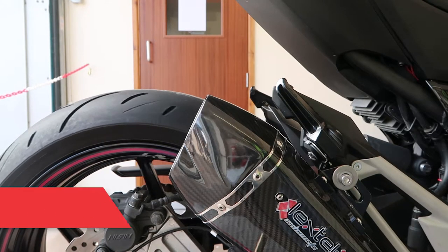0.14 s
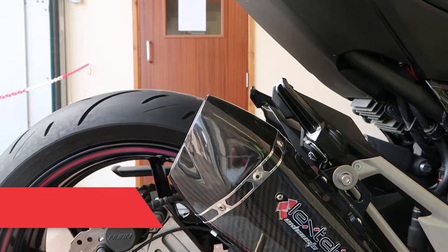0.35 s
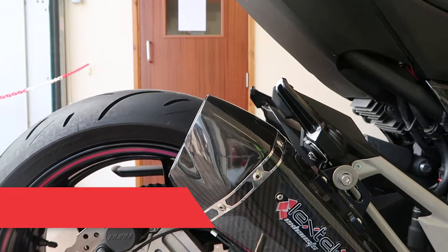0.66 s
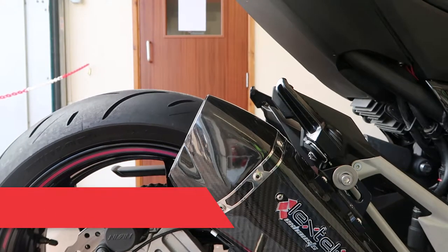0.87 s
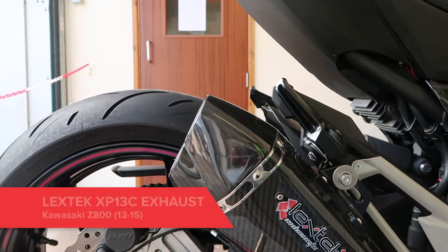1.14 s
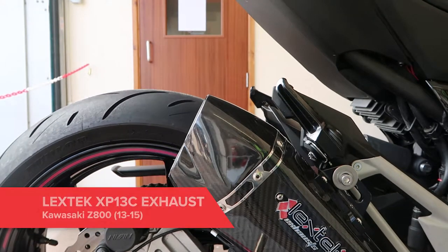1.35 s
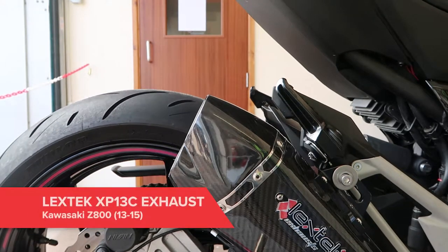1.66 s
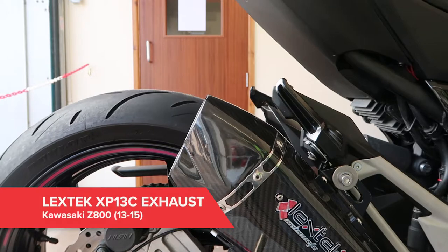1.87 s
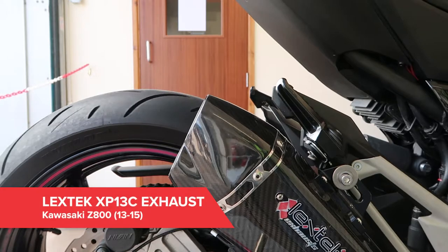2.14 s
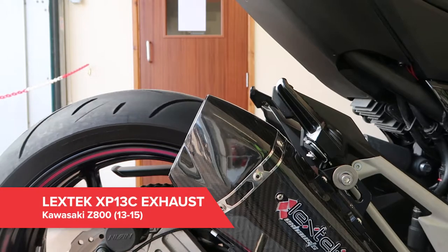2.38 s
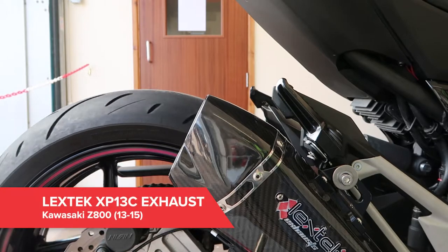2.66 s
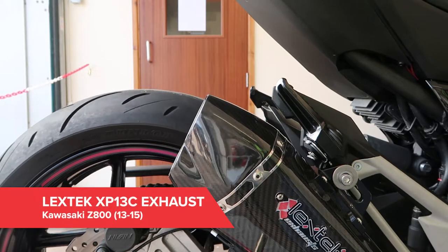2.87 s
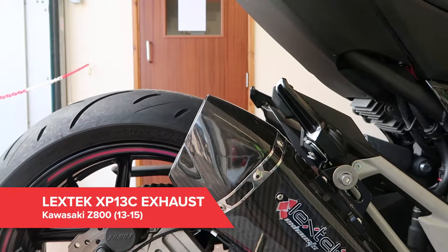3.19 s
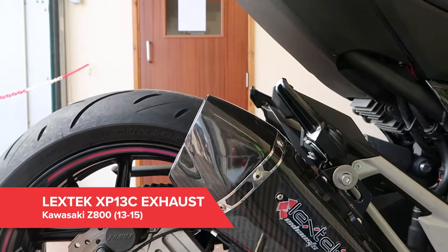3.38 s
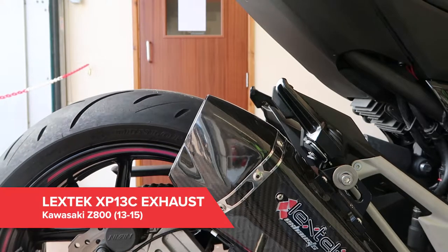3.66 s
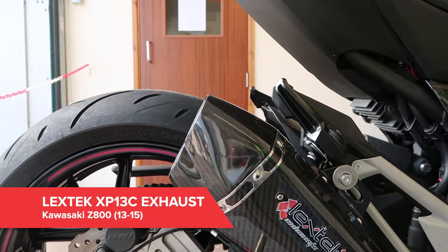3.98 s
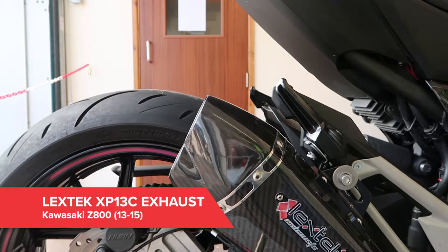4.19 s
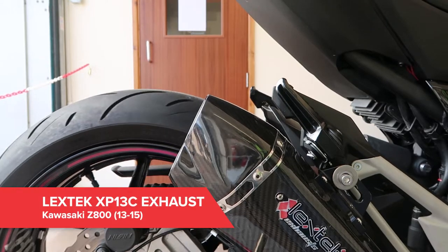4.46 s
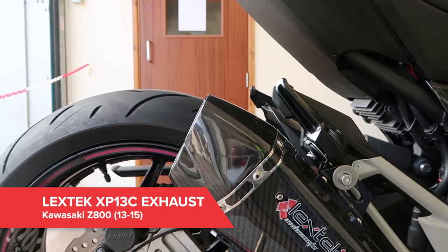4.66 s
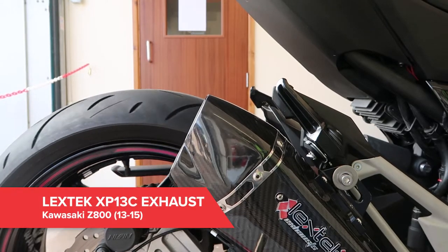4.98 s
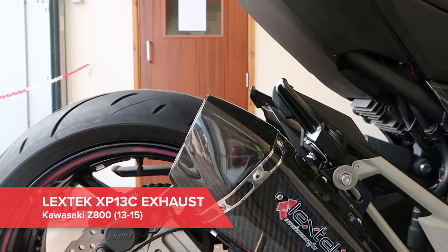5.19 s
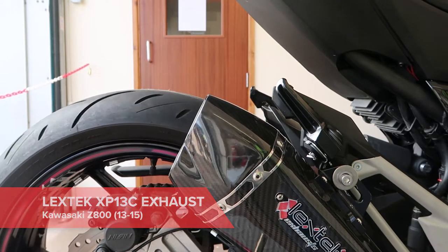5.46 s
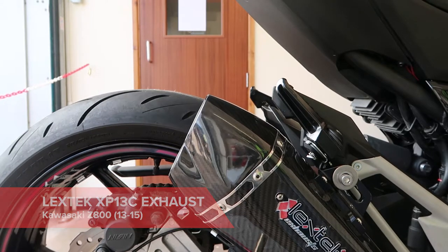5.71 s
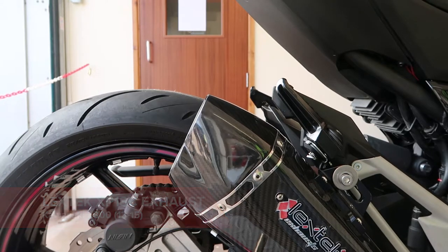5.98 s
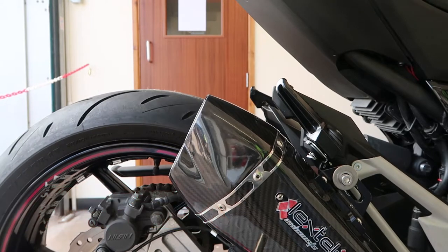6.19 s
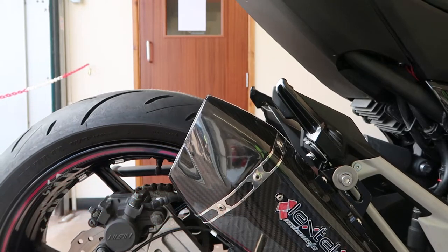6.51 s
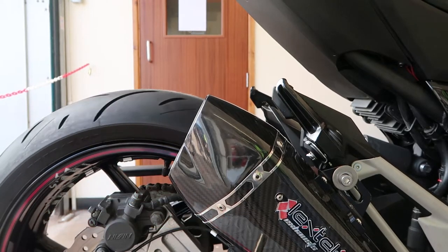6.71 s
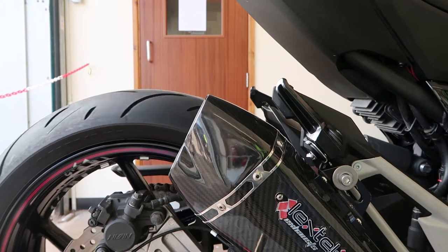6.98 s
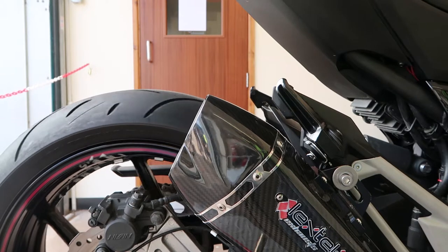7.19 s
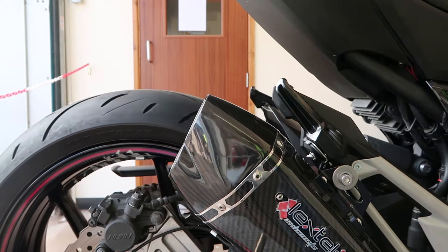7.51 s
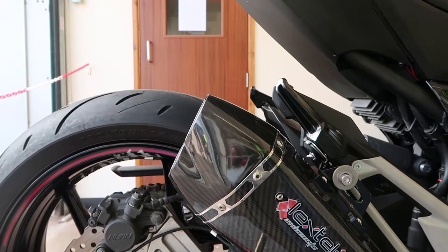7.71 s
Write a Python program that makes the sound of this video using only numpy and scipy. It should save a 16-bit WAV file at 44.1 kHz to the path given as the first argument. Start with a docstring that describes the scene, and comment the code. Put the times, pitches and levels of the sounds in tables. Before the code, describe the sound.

A motorcycle engine idles unevenly indoors and is revved three times, each sharp, loud blip winding back down toward idle.

```python
"""Motorcycle in a workshop

A four-cylinder engine idles between hard walls and its throttle is blipped three times. At idle and
under load, burnt gas leaves in uneven pulses; on the overrun the cylinders pump air and sing clean
harmonics. Silencer and room resonate, gas hisses at the outlet, and a mid-side microphone is close by."""
import sys
import numpy as np
from scipy import signal
from scipy.fft import rfft, irfft, next_fast_len
from scipy.io import wavfile
from scipy.ndimage import uniform_filter1d

SR = 44100
rng = np.random.default_rng(int(sys.argv[2]) if len(sys.argv) > 2 else 0)


def digitize_waveform(pressure):
    """Quantize a signal to 16-bit integers and store it at the path in sys.argv[1].

    Rows of a 2-D input are taken as channels; values are limited to [-1, 1].
    """
    field = np.atleast_2d(pressure).T
    bounded = np.clip(field, -1, 1)
    quanta = np.round(bounded * 32767).astype(np.int16)
    wavfile.write(sys.argv[1], SR, quanta)


N = 346185

# firings that stand out from their neighbours: (time [s], relative level [dB])
STRONG_FIRINGS = [(0.709, -11.5), (0.83, -11.5), (0.86, -13.0), (0.943, -11.5), (1.102, -13.5),
                  (1.346, -12.0), (1.368, -11.5), (1.389, -11.5), (1.507, -12.5), (1.529, -12.0),
                  (1.551, -10.0), (1.574, -10.0), (1.646, -14.5), (1.693, -14.5), (1.713, -11.5),
                  (1.729, -6.0), (1.776, -0.5), (1.795, 0.0), (3.038, -13.5), (3.052, -13.5),
                  (3.072, -13.5), (3.095, -12.0), (3.111, -15.0), (3.198, -14.5), (3.388, -11.5),
                  (3.407, -14.0), (3.426, -13.0), (3.531, -15.0), (3.552, -15.0), (3.576, -14.5),
                  (3.612, -15.0), (3.632, -14.5), (3.72, -14.5), (3.742, -14.5), (3.764, -10.5),
                  (3.804, -11.5), (3.892, -10.5), (3.914, -10.5), (3.935, -9.5), (3.954, -3.5), (3.97, 2.0),
                  (3.985, 5.5), (4.009, 6.0), (4.049, 3.5), (5.478, -13.0), (5.495, -11.0), (5.543, -13.0),
                  (5.579, -7.0), (5.614, -11.5), (5.694, -14.5), (5.769, -13.5), (5.872, -14.5),
                  (5.89, -14.0), (5.909, -10.5), (6.031, -13.5), (6.072, -13.5), (6.112, -15.0),
                  (6.133, -15.0), (6.225, -14.5), (6.249, -12.0), (6.271, -10.0), (6.293, -11.0),
                  (6.313, -7.5), (6.33, 1.0), (6.345, 5.5), (6.37, 6.0), (6.4, 6.0), (7.727, -14.5),
                  (7.775, -15.0)]
# resonances of silencer and room: (frequency [Hz], width [Hz], gain [dB])
SILENCER_AND_ROOM = [(117, 62, 11), (156, 5, -6.5), (164.4, 45, 4.5), (214, 43.5, 12.5), (242, 15, -4),
                     (267.7, 19, 10), (316.3, 38.4, 12), (356, 8.1, -6), (374.6, 14, 9.5),
                     (388.3, 8.6, -12), (424.6, 67, 11.5), (484, 18.3, 7.5), (554, 4.8, -8), (546, 23, 10),
                     (586.5, 50.5, 7.5), (614.4, 11, -3.5), (628, 26, 7.5), (659.6, 14, -20.5),
                     (687.7, 35, 6.5), (747.7, 105, 10.5), (796, 4.1, -11), (836, 90, 6), (863, 30, -17.5),
                     (1042, 89, 12), (1196, 112, -12.5), (1328, 53, 10.5), (1603, 37, 5)]


def from_db(db):
    return 10 ** (np.asarray(db) / 20)


def unit_rms(x):
    return x / np.sqrt(np.mean(x ** 2) + 1e-20)


def curves(rows, start_s=0):
    """Linear interpolation of each column against time, counted from start_s."""
    times, *columns = np.transpose(rows)
    return np.array([np.interp(np.arange(N) / SR, times + start_s, column) for column in columns])


def ramp(start_s, length_s):
    return np.clip((np.arange(N) / SR - start_s) / length_s, 0, 1)


def butter(x, hz, kind, order):
    return signal.sosfilt(signal.butter(order, hz, kind, fs=SR, output="sos"), x)


def coloured(x, points):
    """Spectral shaping by (frequency [Hz], gain [dB]) points on a logarithmic frequency axis."""
    size = next_fast_len(N + 4096)
    hz = np.maximum(np.arange(size // 2 + 1) * SR / size, 1)
    point_hz, point_db = np.transpose(points)
    gain = from_db(np.interp(np.log(hz), np.log(point_hz), point_db))
    return irfft(rfft(x, size) * gain, size)[..., :N]


def resonant(x, resonances):
    """Resonances and antiresonances as a cascade of second-order filters."""
    sections = []
    for hz, width_hz, db in resonances:
        a, cos, q = from_db(db / 2), np.cos(2 * np.pi * hz / SR), np.pi * width_hz / SR
        section = np.array([1 + q * a, -2 * cos, 1 - q * a, 1 + q / a, -2 * cos, 1 - q / a])
        sections.append(section / section[3])
    return signal.sosfilt(sections, x)


def train(at, size):
    """Impulses at fractional sample positions, each shared by two samples."""
    out = np.full(N + 2, 1e-18)
    at = np.clip(at, 0, N)
    np.add.at(out, at.astype(int), size * (1 - at % 1))
    np.add.at(out, at.astype(int) + 1, size * (at % 1))
    return out[:N]


def throttle():
    """Fuel supply governs the source: firing rate, burning share, and pulse, hiss and buzz levels."""
    # the first blip shuts before the start: (opens [s], rate factor [1], shuts [s], fuel returns [s])
    blips = [(-.75, 1, -.45, .524), (1.7, 1, 1.98, 2.936), (3.948, 1.04, 4.275, 5.405),
             (6.308, 1.02, 6.62, 7.712)]
    # run-up: (time after opening [s], firing rate [Hz])
    climb = [(-.05, 58), (0, 46), (.04, 75), (.1, 116), (.16, 181), (.28, 300), (.6, 630)]
    # run-down to idle: (time after fuel returns [s], firing rate [Hz])
    coast = [(-1.3, 417), (-.975, 330), (-.525, 210), (-.375, 174), (-.225, 141), (-.075, 113), (.12, 87),
             (.3, 67), (.45, 55), (.68, 47), (1, 43)]
    # open throttle: (time after opening [s], pulse level [dB], hiss level [dB])
    open_levels = [(-.04, -30, -58), (0, -23.5, -52.5), (.03, -12, -44), (.07, -8.5, -46),
                   (.13, -10, -38.5), (.165, -9.5, -33), (.21, -7.5, -28), (.245, -9, -27), (.31, -9, -25)]
    # shut throttle: (time after fuel returns [s], pulse level [dB], hiss level [dB])
    shut_levels = [(-1.05, -16, -45), (-.95, -15.5, -47), (-.88, -14, -42), (-.79, -14, -36),
                   (-.66, -14.5, -42), (-.48, -15.5, -41), (-.4, -17.5, -44), (-.24, -22, -51),
                   (-.17, -21, -49), (-.03, -25, -55.5), (.53, -31, -60.5)]
    # the outlet tube buzzes once on each overrun: (time after fuel returns [s], gain [dB])
    buzz = [(-1, -8), (-.92, -1), (-.8, 7), (-.72, 2), (-.64, 1), (-.5, -6), (-.25, -15), (-.17, -9),
            (-.05, -16)]
    rounding_hz, dribble = 20.5, .06
    state = 0
    for opens, pull, shuts, refuels in blips:
        rising, falling = pull * curves(climb, opens)[0], curves(coast, refuels)[0]
        rate_hz = -rounding_hz * np.logaddexp(-rising / rounding_hz, -falling / rounding_hz)  # soft min
        fuel_cut = ramp(shuts + .062, .012)
        burn = 1 - (1 - dribble) * (fuel_cut - ramp(refuels - .02, .12))
        fired_db = curves(open_levels, opens) + ramp(shuts, .03) * np.array([[-4.5], [-7]])
        coasting = np.array([fuel_cut, ramp(shuts + .03, .08)])  # gas flow dies more slowly than firing
        levels_db = (1 - coasting) * fired_db + coasting * curves(shut_levels, refuels)
        blip = np.vstack([rate_hz, burn, levels_db, curves(buzz, refuels)])
        state = state + ramp(opens - .07, .03) * (blip - state)  # each blip takes over from the last
    return state


def surges(pulse_db):
    """Hunting: the level swells towards each strong firing and sags after it; returns the added dB."""
    t = np.arange(N) / SR
    slope_db_per_s = 183.5
    swells_db = [min(db - 13, -21.5) - slope_db_per_s * abs(t - s) for s, db in STRONG_FIRINGS]
    return np.maximum(np.max(swells_db, axis=0) - pulse_db, 0)


def crank(rate_hz):
    """Phase is the integral of rate: a firing count, eased to put strong firings on whole numbers."""
    firings = np.cumsum(rate_hz) / SR
    at = np.array(STRONG_FIRINGS)[:, 0] * SR
    counts = np.interp(at, np.arange(N), firings)
    whole = np.cumsum(np.maximum(np.round(np.diff(counts, prepend=0)), 1))
    return firings + np.interp(np.arange(N), at, whole - counts), whole.astype(int)


def exhaust(firings, strong, rate_hz, pulse_db, burn, buzz_db):
    """Source and filter: one gas pulse per firing excites the resonances of silencer and room."""
    # the four cylinders in firing order: (relative level [dB])
    cylinders = [0, -.5, .3, -.3]
    count = np.arange(1, int(firings[-1]))
    at = np.interp(count, firings, np.arange(N))
    i = np.minimum(at.astype(int), N - 1)
    rate_hz, pulse_db, burn = rate_hz[i], pulse_db[i], burn[i]
    size = from_db(pulse_db + np.array(cylinders)[count % 4]) / np.sqrt(rate_hz)  # pulses share power
    time_draw, level_draw, puff_time_draw, puff_size_draw = rng.standard_normal((len(count), 4)).T
    lope_db = 3 * unit_rms(butter(rng.standard_normal(N), 7, "low", order=2))  # idle fires in clumps
    load = np.clip((pulse_db + 22) / 9, 0, 1)
    steep = load * np.clip((rate_hz - 60) / 110, 0, 1)  # the wave front steepens with load and speed

    # combustion is most irregular at low speed and light load
    slowness = np.clip(50 / rate_hz, .12, 1)
    uneven_db = .6 + 2.5 * (1 - load) * slowness
    jitter_ms = slowness * (1 - .8 * load)
    burnt = size * burn * from_db(uneven_db * level_draw + (lope_db[i] - 5.5) * (1 - load))
    burnt[strong - 1] = from_db(np.array(STRONG_FIRINGS)[:, 1] - 32)
    time_draw[strong - 1] = 0
    burnt_at = at + (jitter_ms * time_draw - 1.5 - .94 * (1 - load)) * SR / 1000

    # off load, weaker puffs of either sign fill the gaps with a burble
    puff_at = burnt_at + (.524 + .33 * puff_time_draw) * SR / rate_hz
    puffs = .7 * size * burn * (1 - load) * np.tanh(puff_size_draw)
    dull = train(burnt_at, burnt * (1 - load)) + train(puff_at, puffs)
    dull = butter(butter(dull, 188, "high", order=2), 410, "low", order=5)
    punch = train(burnt_at, burnt * (load - steep))  # full load at low speed: tight thuds
    punch = butter(butter(punch, 270, "high", order=2), 472, "low", order=4)
    sharp = train(burnt_at, burnt * steep)
    sharp = butter(butter(sharp, 290, "high", order=2), 716, "low", order=4)
    combustion = from_db(6) * dull + from_db(4.5) * punch + from_db(-3) * sharp

    # pumped air pulses steadily; two header pairs of unequal length add the crank's odd orders
    air = size * np.sqrt(1 - burn ** 2) * from_db(.55 * level_draw)
    even = train(at, air)
    odd = butter(train(at, (air + .12 * burnt * steep) * (-1) ** count), 235, "high", order=3)
    pumping = butter(butter(even, 72, "high", order=3), 447, "low", order=3)
    pumping += from_db(-8.5) * butter(odd, 509, "low", order=2)

    # steep fronts and the buzzing outlet tube supply the treble
    fronts = train(burnt_at, burnt * steep ** 2)
    buzz = from_db(buzz_db) * (odd + from_db(-6) * even)
    rasp = butter(from_db(-12) * fronts + from_db(-28) * buzz, [980, 1720], "band", order=4)
    ring = butter(from_db(-22) * fronts + from_db(-27) * buzz, [2810, 2980], "band", order=2)
    return resonant(-from_db(56) * (combustion + pumping + rasp + ring), SILENCER_AND_ROOM)


def outlet_hiss(firings, hiss_db, burn):
    """Jet noise: outflowing gas hisses with each pulse, thinner on the overrun; returns mid and side."""
    # jet spectrum at the mid capsule: (frequency [Hz], relative level [dB])
    mid_spectrum = [(600, -39.5), (1000, -15), (1500, -10.5), (1900, -12), (2500, -17.5), (4000, -16),
                    (6000, -25.5), (7100, -34), (7600, -42), (10000, -63), (15500, -81)]
    # jet spectrum at the side capsule: (frequency [Hz], relative level [dB])
    side_spectrum = [(700, -33.5), (1200, -8), (2000, -2), (2800, -3.5), (4300, -8), (5200, -12),
                     (7100, -24), (7600, -26), (10000, -38), (15500, -60)]
    # outlet tube resonances: (frequency [Hz], width [Hz], gain [dB])
    tube_modes = [(1340, 110, 5), (1590, 130, 10), (1850, 150, -4), (2330, 120, 5), (2900, 200, 15),
                  (3320, 80, 4), (3620, 200, -5), (4000, 200, 6), (4950, 300, 4)]
    correlation, ring_onset_db = .1, -48
    noise = rng.standard_normal((2, N))
    noise[1] = correlation * noise[0] + np.sqrt(1 - correlation ** 2) * noise[1]
    noise *= from_db(np.cos(2 * np.pi * firings))
    noise += from_db(23.6 * (1 - burn) - 6) * butter(rng.standard_normal((2, N)), 8560, "high", order=4)
    broad = coloured(noise[0], mid_spectrum)
    side = unit_rms(coloured(noise[1], side_spectrum))
    ringing = np.clip(.5 + (hiss_db - ring_onset_db) / 16, .35, 1)
    mid = ringing * unit_rms(resonant(broad, tube_modes))
    mid += (1 - ringing) * from_db(-.5) * unit_rms(broad)
    return from_db(hiss_db) * np.array([mid, from_db(3.5) * side])


def frame_rumble(pulse_db):
    """Structure-borne sound: the shaken frame, stand and floor radiate lumpy low noise."""
    noise = butter(rng.standard_normal(N), [35, 190], "band", order=2)
    lumps = unit_rms(butter(rng.standard_normal(N), 13, "low", order=2))
    return from_db(pulse_db - 48 + 2 * lumps) * unit_rms(noise)


def silencer_churn(pulse_db, burn):
    """Turbulence: burnt gas tumbles inside the silencer with a dull rasp."""
    noise = resonant(butter(rng.standard_normal(N), [650, 1250], "band", order=2), SILENCER_AND_ROOM)
    smooth_db = uniform_filter1d(np.minimum(pulse_db, -22), size=SR // 20)
    return from_db(smooth_db - 22.5) * burn * unit_rms(noise)


def floor_echo(pulses, burn, delay_s=.0063):
    """Reflection: the floor returns a delayed copy, here scaled by the burning share."""
    return from_db(-13) * burn * np.pad(pulses, (int(delay_s * SR), 0))[:N]


def workshop(x, t60_s=.55):
    """Reverberation: echoes recirculate in delays of unrelated lengths, ten for each capsule."""
    size = next_fast_len(N + SR)
    phase_per_s = -2j * np.pi * np.arange(size // 2 + 1) * SR / size
    capsules = []
    for lags_s in np.geomspace(.0083, .045, 20).reshape(10, 2).T:
        loops = [from_db(-60 * lag / t60_s) * np.exp(phase_per_s * lag) for lag in lags_s]
        response = sum((-1) ** k * loop / (1 - loop) for k, loop in enumerate(loops))
        capsules.append(irfft(rfft(x, size) * response, size)[:N])
    return butter(np.array(capsules), 133, "high", order=2) / np.sqrt(10)


def idle_hum(firings, rate_hz, pulse_db):
    """The fundamental: near idle the firing rate is heard as a low tone that swells with the surges."""
    swell_db = uniform_filter1d(np.minimum(pulse_db, -22), size=SR // 12) + 29
    near_idle = np.clip((85 - rate_hz) / 25, 0, 1)
    return from_db(1.6 * swell_db - 41) * near_idle * np.sin(2 * np.pi * firings)


def scene():
    """Superposition at the mid and side capsules; their sum and difference give left and right."""
    # wall and frame reflections colour the side hiss: (frequency [Hz], width [Hz], gain [dB])
    reflections = [(1050, 120, 17.5), (1480, 100, -7), (1850, 150, 3), (2050, 120, -8.5), (2450, 150, 3.5),
                   (3000, 400, -1), (3900, 120, 7), (4500, 200, 11.5), (4800, 200, -14), (5300, 300, -1.5),
                   (6400, 300, 4.5), (7500, 900, -10)]
    # pickup of the mid sound by the side capsule: (frequency [Hz], gain [dB])
    crosstalk = [(30, -4), (60, -48), (250, -63.5), (370, -49.5), (530, -29.5), (750, -17.5), (1080, -6.5),
                 (1560, -4.5), (2200, -2.5), (4000, -23)]
    rate_hz, burn, pulse_db, hiss_db, buzz_db = throttle()
    surge_db = surges(pulse_db)
    pulse_db, hiss_db = pulse_db + surge_db, hiss_db + .9 * surge_db
    firings, strong = crank(rate_hz)
    pulses = exhaust(firings, strong, rate_hz, pulse_db, burn, buzz_db)
    pulses += floor_echo(pulses, burn)
    room_mid, room_side = from_db(-9.5) * workshop(pulses)
    hiss_mid, hiss_side = outlet_hiss(firings, hiss_db, burn)
    mid = pulses + hiss_mid + frame_rumble(pulse_db) + silencer_churn(pulse_db, burn)
    mid += room_mid + idle_hum(firings, rate_hz, pulse_db)
    side = resonant(hiss_side, reflections) + coloured(mid + from_db(-1.5) * room_side, crosstalk)
    return np.array([mid + side, mid - side])


def record(dry, cutoff_hz=15700):
    """Clipping: the gain rises, the strongest pulses hit full scale, and a low-pass cuts the top."""
    # input gain, turned up as the first audible blip begins: (time [s], gain [dB])
    input_gain = [(0, -17), (1.25, -16), (1.65, -15.5), (1.8, -2.5)]
    clipped = np.clip(from_db(curves(input_gain)[0]) * dry, -1, 1)
    return signal.sosfilt(signal.cheby2(12, 70, cutoff_hz, fs=SR, output="sos"), clipped)


dry = scene()
out = record(dry)
digitize_waveform(out)
```